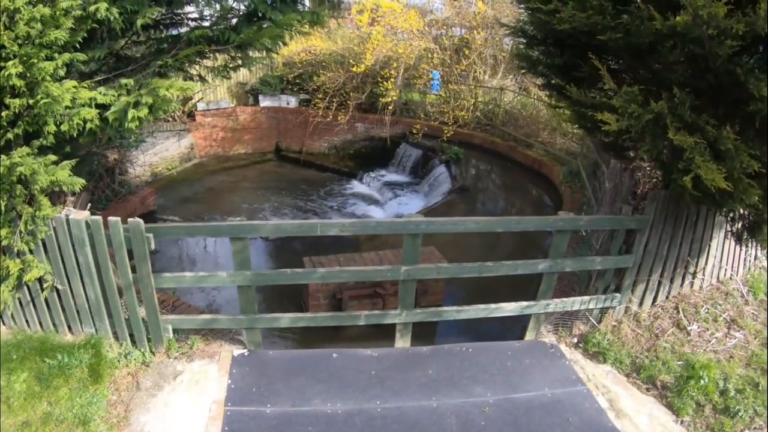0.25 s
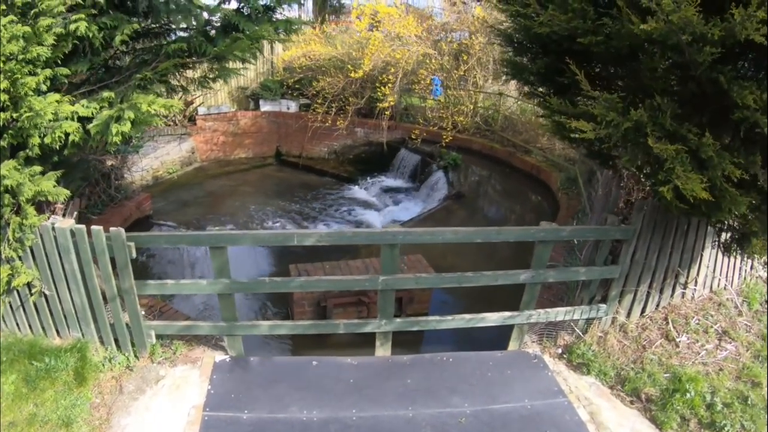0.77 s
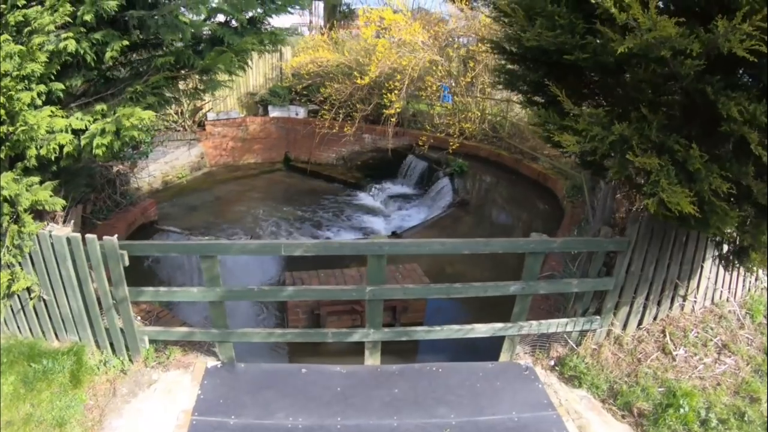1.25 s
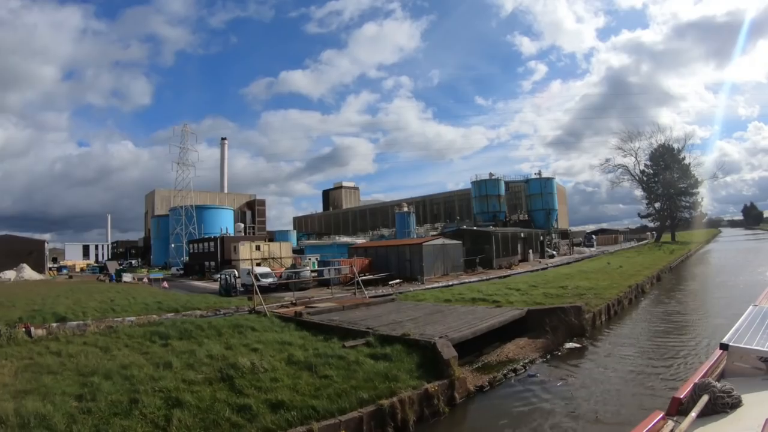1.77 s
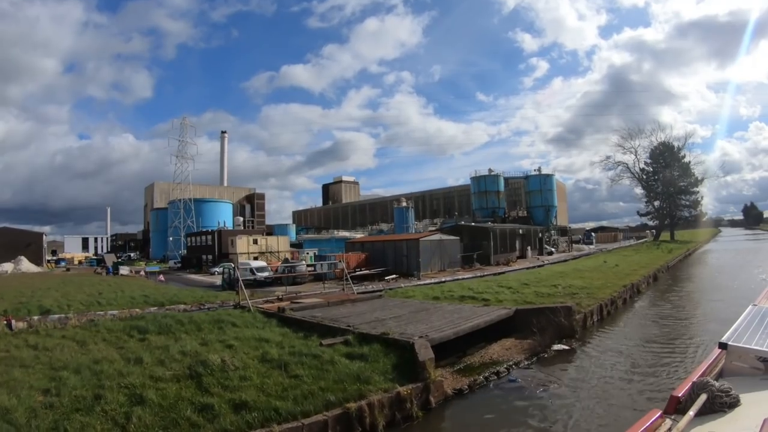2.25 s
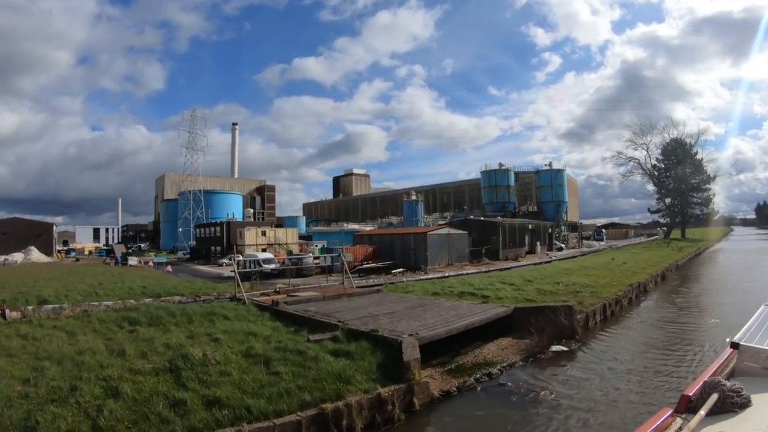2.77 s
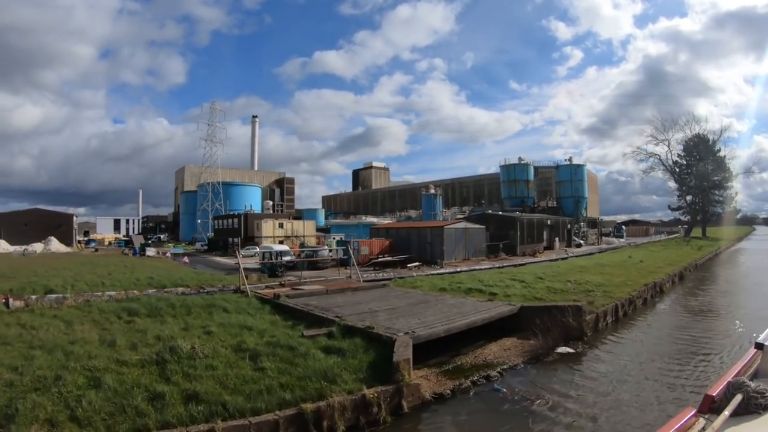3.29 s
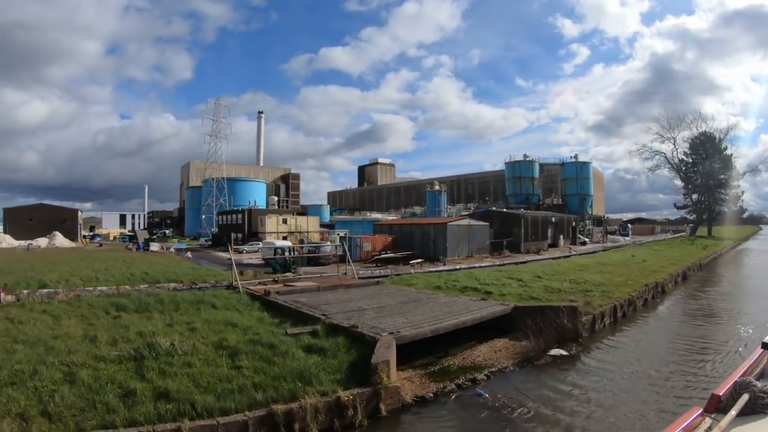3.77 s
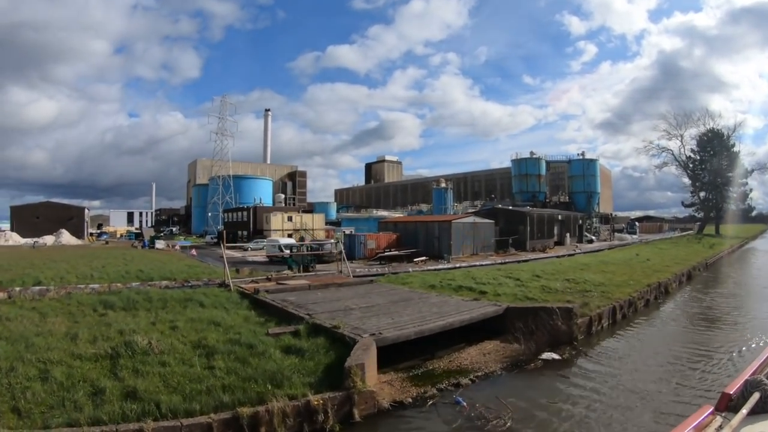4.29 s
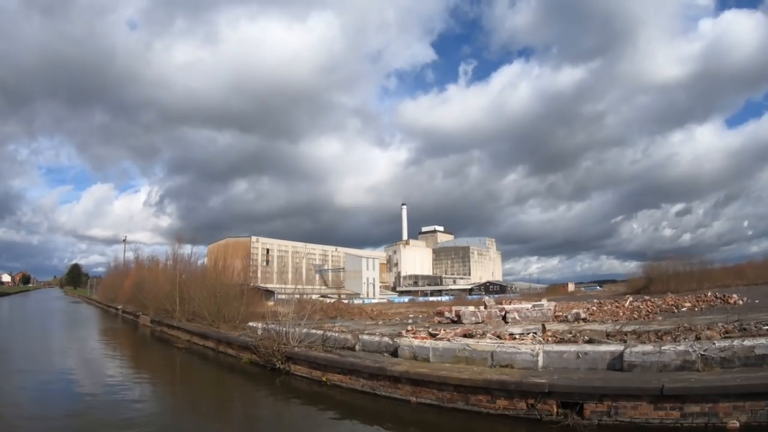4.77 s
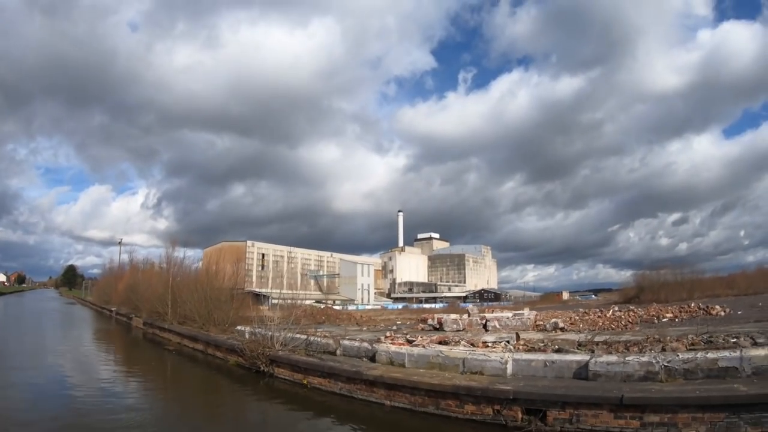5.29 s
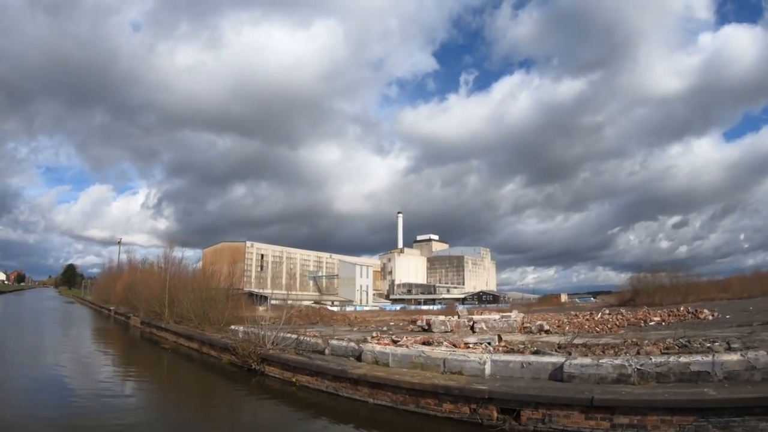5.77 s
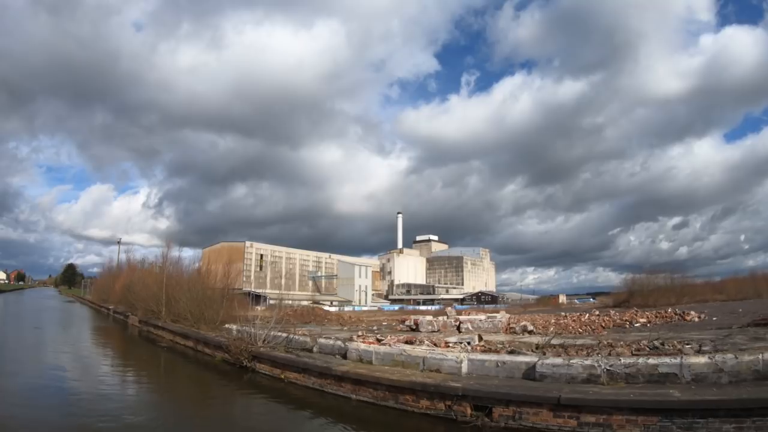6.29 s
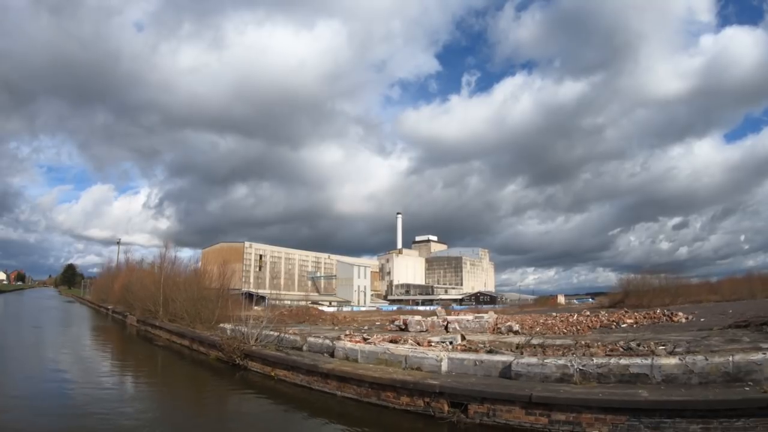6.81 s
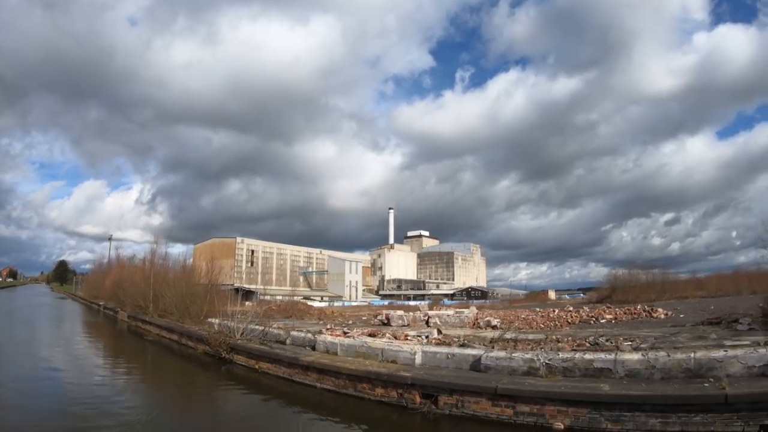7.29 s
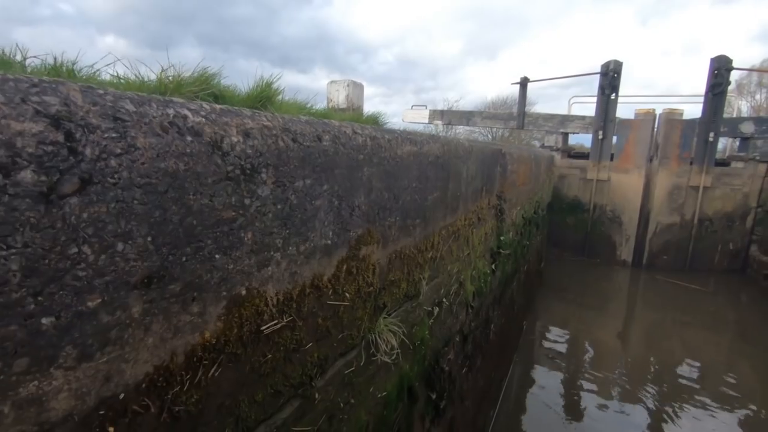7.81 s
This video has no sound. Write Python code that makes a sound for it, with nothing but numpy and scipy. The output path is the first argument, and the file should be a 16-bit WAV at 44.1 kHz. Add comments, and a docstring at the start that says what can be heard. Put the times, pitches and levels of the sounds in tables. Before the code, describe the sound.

Heard aboard a canal boat, a steady low diesel drone with soft rapid clatter mixes with rushing water. Right away come a splash, tiny bird pips and several dry metal squeals. The sound cuts to a works bank with fine water crackle and wind gusts, then to open water with heavier wind buffeting the microphone. A click cuts to a lock, where the engine idles lower and slower.

```python
"""A canal boat's three-cylinder diesel heard aboard at four places, one cutting to the next: past an overflow weir,
past a works, along open water, and idling in a lock. The exhaust (a stack of cycle orders) drones; the engine (noise
bursts ringing the casing) clatters twice a firing; water (patchy coloured noise) washes and splashes; wind (gusty low
noise) buffets the microphone. Early on a metal joint squeals (gliding tones) and a small bird pips (sines)."""
import sys
import numpy as np
from scipy import signal
from scipy.fft import rfft, irfft, next_fast_len
from scipy.io import wavfile
from scipy.ndimage import uniform_filter1d, map_coordinates

SR = 44100
rng = np.random.default_rng(int(sys.argv[2]) if len(sys.argv) > 2 else 0)


def transcribe(signal):
    """Save signal, clipped to [-1, 1], as a 16-bit WAV file at the path in sys.argv[1]."""
    frames = np.atleast_2d(signal).T
    limited = np.clip(frames, -1, 1)
    pcm = np.round(limited * 32767).astype(np.int16)
    wavfile.write(sys.argv[1], SR, pcm)


N = 355005

# start of each place, then an end past the last sample: t/s
CUTS_S = [0, 1.75, 4.465, 7.63, 8.1]


def amp(db):
    """Decibels to gain."""
    return 10 ** (np.asarray(db) / 20)


def unit(x):
    """Scale to rms 1."""
    return x / np.sqrt(np.mean(x ** 2) + 1e-20)


def clock():
    """Time of every sample in s."""
    return np.arange(N) / SR


def wobble(rate_hz):
    """Smooth random curve, rate_hz knots a second."""
    knots = rng.standard_normal(int(N * rate_hz / SR) + 4)
    return map_coordinates(knots, [np.arange(N) * rate_hz / SR])


def shape(points):
    """Gain against frequency from (f/Hz, level/dB) points on a log axis."""
    f_hz, db = np.transpose(points)
    return lambda hz: amp(np.interp(np.log(hz + 1), np.log(f_hz + 1), db))


def filtered(x, response):
    """Multiply the spectrum of x by a complex response of frequency."""
    m = next_fast_len(N + SR // 4)
    return irfft(rfft(x, m) * response(np.fft.rfftfreq(m, 1 / SR)), m)[:N]


def rush(spectrum, patchy_db):
    """Coloured noise of rms 1 with time-frequency patches of random gain."""
    z = signal.stft(rng.standard_normal(N), nperseg=512)[2]
    field = uniform_filter1d(rng.standard_normal(z.shape), size=6, axis=0)
    field = uniform_filter1d(field, size=8, axis=1)
    patchy = signal.istft(z * amp(patchy_db * unit(field)), nperseg=512)[1][:N]
    return unit(filtered(patchy, shape(spectrum)))


def gusts():
    """Wind strength in dB over the breeze; each gust swells and dies as a bell curve."""
    # gusts: peak t/s, half length to 1/e /s, level over breeze/dB
    gust_bells = [(2.68, .24, 5), (3.13, 0.25, 5.5), (4.303, 0.12, 1.5), (4.688, 0.31, 7.5),
                  (5.266, 0.33, 5.3), (6.462, 0.24, 5), (7.0, 0.46, 5), (7.587, 0.076, 4)]
    t = clock()
    return sum(db * np.exp(-((t - peak_s) / half_s) ** 2) for peak_s, half_s, db in gust_bells)


def wind():
    """Lumpy gusts press on the microphone, on top of each place's breeze."""
    # wind pressure spectrum: f/Hz, relative level per Hz/dB
    buffet_spectrum = [(1, -3), (7, -0.5), (16, -4), (28, -8.5), (40, -11), (60, -21), (120, -30),
                       (300, -37.5), (1000, -81)]
    # breeze between gusts at the weir, works, open water, lock: level/dB
    place_breeze_db = [-38, -29.5, -28.5, -30]
    breeze_db = np.array(place_breeze_db)[np.digitize(clock(), CUTS_S[1:-1])]
    return amp(breeze_db + gusts() + 1.35 * wobble(8)) * rush(buffet_spectrum, patchy_db=0.2)


def water(spectrum, patchy_db):
    """Wash of water and air: patchy noise, high-passed at 110 Hz, rms 1."""
    return unit(filtered(rush(spectrum, patchy_db), lambda f: f * f / (f * f + 110 ** 2)))


def splashes():
    """Short bright spatters of water; fine droplets crackle where the wake runs along the bank at the works."""
    # spatters: start t/s, start level/dB, time to fall 20 dB /s
    spatters = [(.083, -28.5, 0.017), (2.155, -43, 0.03), (2.56, -45, 0.024), (3.155, -46.5, .02)]
    t = clock()
    bursts = sum(amp(db - 20 * np.abs(t - s) / decay_s) * (t >= s) for s, db, decay_s in spatters)
    at_works = (t > CUTS_S[1]) * (t < CUTS_S[2])
    droplets = amp(-58.0 + 5.7 * wobble(250) + 1.1 * wobble(8.9)) * at_works
    # f/Hz, relative level per Hz/dB
    spray_spectrum = [(1000, -25), (3000, 3.0), (6000, -1), (8500, -6.5), (11000, -16.5), (15000, -31)]
    return (bursts + droplets) * rush(spray_spectrum, patchy_db=1.5)


def cut_click():
    """The cut into the lock snaps: a step in pressure that quickly relaxes."""
    since_s = clock() - CUTS_S[3]
    return amp(-14.5) * np.exp(-np.abs(since_s) / .002) * (since_s >= 0)


def bird():
    """Thin, high pips from the bank: sines under bell curves."""
    # pips: peak t/s, f/Hz, level/dB, half length to 1/e /s
    pip_list = [(0.061, 6880, -35, 0.013), (0.12, 8570, -43, 0.021)]
    t = clock()
    return sum(amp(db) * np.exp(-((t - s) / half_s) ** 2) * np.sin(2 * np.pi * hz * t)
               for s, hz, db, half_s in pip_list)


def squeal():
    """Dry metal sticks and slips at its own pitch; overtones come only when it rubs hardest."""
    # slips: peak t/s, pitch before sag and jitter/Hz, level/dB, time to fade 20 dB /s
    slip_list = [(.222, 1613, -25.5, .135), (.43, 1575, -31.5, .028), (.555, 1595, -35.5, .024),
                 (.653, 1609, -20.5, .074)]
    # partials at full force: multiple of pitch, level on top of the slip's/dB
    partials = [(1, 1.5), (2, -16.5), (3, -19), (4, -20), (5, -29)]
    rise_per_fade, rounding = .68, 1.35  # rounding: 1 pointed peak, 2 round
    sag_hz_per_s = 210  # after the peak, as the rubbing eases off
    overtone_fade = 3  # extra dB the overtones lose per dB of easing
    t, out = clock(), np.zeros(N)
    jitter_hz, flutter_db = 7 * wobble(70), 1.2 * wobble(70)
    for peak_s, hz, db, fade_s in slip_list:
        near = np.abs(t - peak_s) < 2 * fade_s
        since_s = t[near] - peak_s
        eased_db = 20 * (np.maximum(since_s, -since_s / rise_per_fade) / fade_s) ** rounding
        pitch_hz = hz - sag_hz_per_s * np.maximum(since_s, 0) + jitter_hz[near]
        phase = 2 * np.pi * np.cumsum(pitch_hz) / SR
        tone = sum(amp(level_db - overtone_fade * eased_db * (k > 1)) * np.sin(k * phase)
                   for k, level_db in partials)
        out[near] += amp(db - eased_db + flutter_db[near]) * tone
    return out


def clatter(firings, index, burst_width, valve_db, between_db, blow_db, dull_hz, scatter_db):
    """Each firing gives a sharp blow in a burst of combustion noise, then a valve burst; all ring the casing."""
    # casing resonances: f/Hz, width/Hz, relative level/dB at the weir, works, open water, lock
    casing_modes = [(468, 48, 5.5, 5, 2.5, 10.5), (796, 46, 0, 3.5, -3, -2), (1024, 36.5, 8.5, 3.5, 4, 2),
                    (1486, 91, 4.5, -4, 2.5, -3), (1817, 27, -14, -3, -14, 2.5),
                    (1966, 130, 3.5, -10, -24, -13), (2400, 150, -17, -13, -10, -15),
                    (2850, 250, -24, -14.5, -10.5, -19), (3930, 250, -36, -32, -12, -27),
                    (4255, 60, -33, -32, -14.5, -25), (6100, 500, -17, -30, -21, -35)]
    # clatter between the resonances: f/Hz, relative level per Hz/dB
    knock_spectrum = [(150, -21), (260, -4), (340, -10), (700, -11), (1800, -7), (3300, -15), (5200, -31),
                      (9500, -26), (15500, -42.5)]

    def bursts(lag, width):  # both in firing periods
        since = firings - np.floor(firings[0]) - lag + 2
        nearest = np.round(since)
        size = amp(scatter_db * rng.standard_normal(int(since[-1]) + 2))
        return size[nearest.astype(int)] * np.exp(-.5 * ((since - nearest) / width) ** 2)

    def casing(f):
        return sum(amp(dbs[index]) * (1j * f * w / (c * c - f * f + 1j * f * w)) for c, w, *dbs in casing_modes)

    combustion = bursts(.35, burst_width)
    valves = amp(valve_db) * bursts(1.0, burst_width)
    force = unit(combustion + valves + amp(between_db))
    blows = amp(blow_db) * unit(bursts(.3, 0.0016))
    knock = filtered(force * rng.standard_normal(N), lambda f: shape(knock_spectrum)(f) / (1 + 1j * f / dull_hz))
    ring = filtered(force * rng.standard_normal(N) + blows, lambda f: casing(f) / (1 + (f / 7000) ** 4))
    return unit(knock + ring)


def exhaust(firings, index, waver_db, phase_spread_rad, hollow_hz, hollow_width_hz):
    """Pipe pulses as cycle orders; two strong cylinders and a weak one fill in between the firing lines."""
    # lines: multiple of the four-stroke cycle (every third is a firing order),
    # relative level/dB at the weir, works, open water, lock
    order_lines = [(1, -60, -41, -45, -58), (2, -40, -49, -55, -39), (3, -53, -27, -36, -29.5),
                   (4, -47, -56, -47, -29), (5, -66, -74, -62, -44), (6, -22.5, -23, -25, -24.5),
                   (7, -53, -63, -54, -23), (8, -52, -54, -60, -28), (9, -24, -30, -27.5, -29),
                   (10, -55, -57, -64, -31.5), (12, -34.5, -42.5, -36, -31.5), (14, -78, -66, -71, -44),
                   (15, -45, -46.5, -48, -45), (16, -50, -45.5, -52, -57), (17, -54, -44, -77, -55),
                   (18, -54, -79, -46.5, -44), (19, -71, -56, -50.5, -53), (21, -70, -54, -53, -57),
                   (30, -66, -70, -54.5, -64), (33, -48, -49.5, -53.5, -75), (36, -49, -48.5, -51, -72),
                   (39, -46, -55.5, -52, -74), (51, -70.5, -54, -67, -46)]
    here = slice(int(CUTS_S[index] * SR), int(CUTS_S[index + 1] * SR))
    phase, t, drone = 2 * np.pi * firings[here] / 3, clock()[here], np.zeros(N)
    knots_s = np.arange(0, 9, 1 / 10)
    loudest_db = max(row[index + 1] for row in order_lines)
    cycle_hz = (phase[-1] - phase[0]) / (t[-1] - t[0]) / (2 * np.pi)
    for multiple, *dbs in order_lines:
        k = round(multiple)
        line_hz = k * cycle_hz
        weakness = np.sqrt((loudest_db - dbs[index]) / 20)  # weak lines waver most
        line_waver_db = waver_db * weakness * np.interp(t, knots_s, rng.standard_normal(len(knots_s)))
        # a hollow on the way delays the lines near its pitch
        lag_rad = 2 * np.arctan2(hollow_width_hz * line_hz, hollow_hz ** 2 - line_hz ** 2)
        lag_rad -= np.angle(1 + np.exp(-2j * np.pi * k / 3))  # the two strong cylinders
        # each line starts at a slightly random phase, which blurs the pulses
        phase_offset_rad = phase_spread_rad * rng.standard_normal()
        drone[here] += amp(dbs[index] + line_waver_db) * np.sin(k * phase - lag_rad + phase_offset_rad)
    return drone / np.std(drone[here])


def aboard(wash, index, firing_hz, delay_periods, exhaust_db, noise_db, noise_dip, swell_db_per_s,
           phase_spread_rad, hollow_hz, hollow_width_hz, waver_db, clatter_db, wash_db, patchy_db, **knock):
    """Steady-throttle engine and water at one place, silent elsewhere; gusts dip both, the noise drifts in level."""
    exhaust_dip = 0.69  # a gust carries the exhaust away: dB lost per dB of gust, as noise_dip
    since_s, gust_db = clock() - CUTS_S[index], gusts()
    firings = firing_hz * since_s - delay_periods + 0.0058 * wobble(12)
    pulses = exhaust(firings, index, waver_db, phase_spread_rad, hollow_hz, hollow_width_hz)
    drone = amp(exhaust_db - exhaust_dip * gust_db) * pulses
    noise = amp(clatter_db) * clatter(firings, index, **knock) + amp(wash_db) * water(wash, patchy_db)
    noise_gain = amp(noise_db + swell_db_per_s * since_s - noise_dip * gust_db)
    inside_s = np.minimum(since_s, CUTS_S[index + 1] - clock())
    return (drone + noise_gain * noise) * np.clip(inside_s / 0.0015, 0, 1)


def boat():
    """The engine from four positions: veiled by the weir, half shielded, in plain view, idling between lock walls."""
    # wash of water and air at each place: f/Hz, relative level per Hz/dB
    weir_wash = [(170, 0.5), (290, -9.5), (350, -7), (700, -5.5), (2200, -12), (4000, -18), (9000, -23.5),
                 (15600, -39.5)]
    works_wash = [(200, 0.5), (330, -7.5), (650, -4.5), (1800, -7.5), (4000, -19.5), (7000, -26.5),
                  (11000, -40.5), (15600, -50)]
    open_wash = [(170, 4.5), (330, -12.5), (900, -1), (2000, -10.5), (4200, -19), (5300, -24),
                 (9000, -34.5), (15500, -43)]
    lock_wash = [(170, 6), (300, -19), (850, -6), (1300, -13.5), (3000, -25), (7500, -26.5), (15600, -48)]
    weir = aboard(
        weir_wash, index=0, firing_hz=36.03, delay_periods=.7,
        exhaust_db=-22.5, noise_db=-35.5, noise_dip=0, swell_db_per_s=1.1,
        phase_spread_rad=0.045, hollow_hz=136.0, hollow_width_hz=20, waver_db=-1.5,
        clatter_db=-2.5, wash_db=-3.0, patchy_db=1.6,
        burst_width=0.069, valve_db=-5.5, between_db=-10.5, blow_db=-31.5, dull_hz=2600, scatter_db=2.7)
    works = aboard(
        works_wash, index=1, firing_hz=38.8, delay_periods=1.72,
        exhaust_db=-21.0, noise_db=-35.0, noise_dip=0.18, swell_db_per_s=-0.03,
        phase_spread_rad=0.057, hollow_hz=122.0, hollow_width_hz=36, waver_db=0.8,
        clatter_db=-6.5, wash_db=-2.5, patchy_db=1.0,
        burst_width=0.13, valve_db=-11.5, between_db=-15, blow_db=-13.5, dull_hz=1400, scatter_db=-2.0)
    open_water = aboard(
        open_wash, index=2, firing_hz=38.71, delay_periods=1.87,
        exhaust_db=-20.6, noise_db=-34.5, noise_dip=0.41, swell_db_per_s=0.41,
        phase_spread_rad=0.3, hollow_hz=278, hollow_width_hz=35, waver_db=-0.3,
        clatter_db=-1.5, wash_db=-5.5, patchy_db=1.5,
        burst_width=0.084, valve_db=-5.3, between_db=-19.5, blow_db=-38, dull_hz=17000, scatter_db=1.5)
    lock = aboard(
        lock_wash, index=3, firing_hz=25.87, delay_periods=0.198,
        exhaust_db=-20.5, noise_db=-42, noise_dip=0, swell_db_per_s=-2,
        phase_spread_rad=0.11, hollow_hz=39.6, hollow_width_hz=20, waver_db=-2.6,
        clatter_db=-2, wash_db=-0.5, patchy_db=2.9,
        burst_width=0.12, valve_db=-2, between_db=-2, blow_db=-32, dull_hz=600, scatter_db=2.0)
    return weir + works + open_water + lock


def scene():
    """Everything at the one microphone."""
    return (wind() + splashes() + cut_click() + bird() + squeal() + boat())[None]


def record(dry):
    """Keep nothing above the band limit."""
    top_hz = 15800
    return filtered(dry[0], lambda hz: hz < top_hz)[None]


dry = scene()
out = record(dry)
transcribe(out)
```